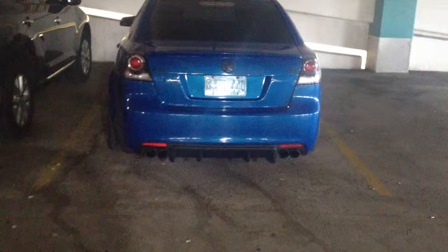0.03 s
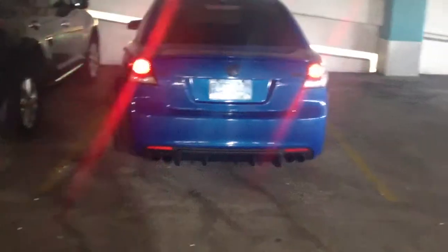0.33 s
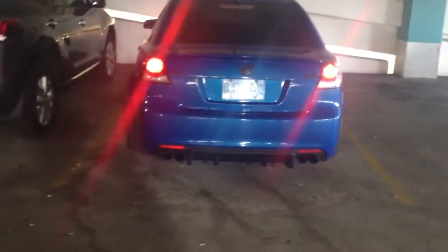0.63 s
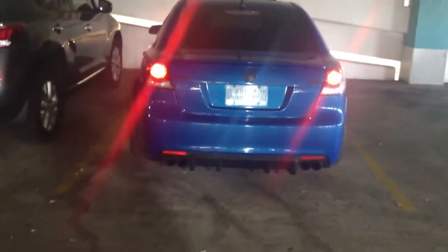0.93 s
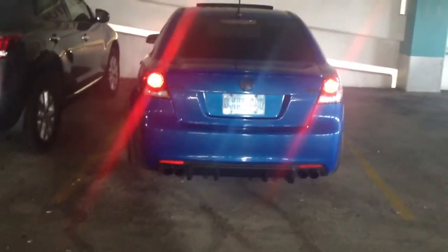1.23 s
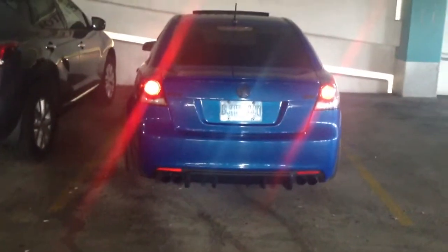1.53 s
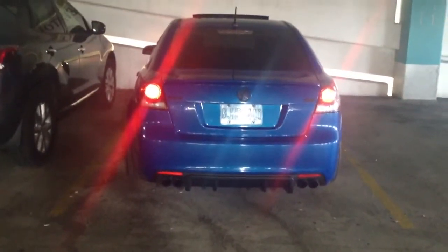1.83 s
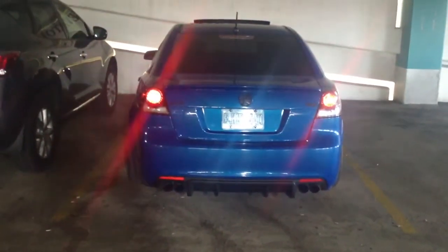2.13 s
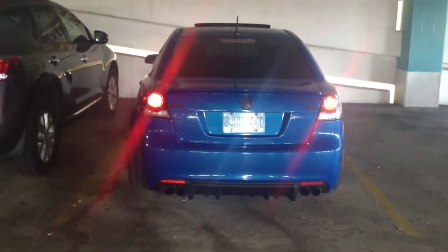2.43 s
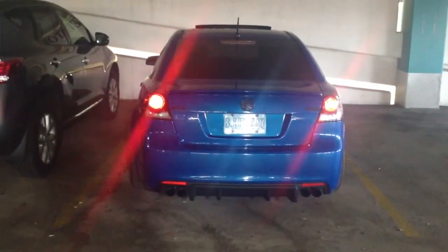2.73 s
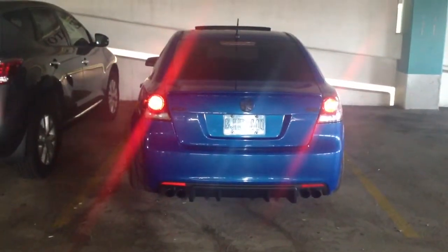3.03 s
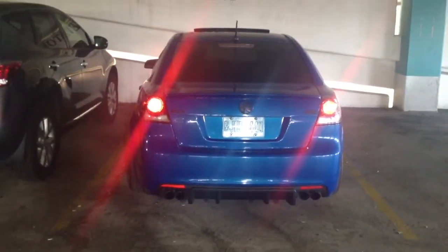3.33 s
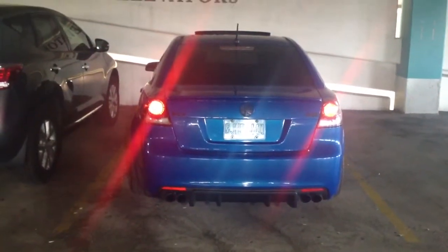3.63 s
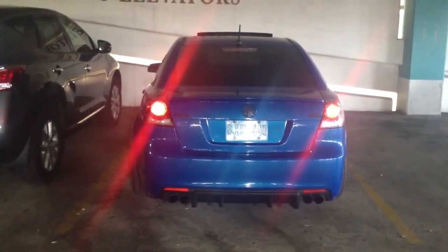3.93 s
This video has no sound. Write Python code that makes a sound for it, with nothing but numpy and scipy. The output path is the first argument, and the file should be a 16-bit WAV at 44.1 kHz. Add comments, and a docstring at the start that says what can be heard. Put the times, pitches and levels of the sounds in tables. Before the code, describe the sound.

A car starts up in an echoing garage, flaring briefly before a booming idle.

```python
"""A concrete parking garage, one microphone behind a six-cylinder car that starts from cold.
Over the ventilation a relay ticks, an actuator whines and the fuel pump primes. The starter's pinion
clashes in and cranks, labouring at each compression. The engine catches, flares with a bark and
settles into a fast idle, its uneven firings booming through the pipes and off the concrete."""
import sys
import numpy as np
from scipy import signal
from scipy.fft import rfft, irfft, next_fast_len
from scipy.io import wavfile
from scipy.ndimage import map_coordinates

SR = 44100
rng = np.random.default_rng(int(sys.argv[2]) if len(sys.argv) > 2 else 0)


def wav_record(signal):
    """Record a signal, one row per channel, as 16-bit PCM in the file named by sys.argv[1]."""
    frames = np.transpose(np.atleast_2d(signal))
    bounded = np.clip(frames, -1, 1)
    # unit amplitude maps onto the largest positive 16-bit level
    quanta = np.round(bounded * 32767).astype(np.int16)
    wavfile.write(sys.argv[1], SR, quanta)


N = 176400
PRIME_S, ENGAGE_S, CATCH_S, RELEASE_S = 1.497, 2.012, 2.692, 2.72
MIC_OPEN_S, MIC_TOP_HZ = .119, 15400

# engine speed: t/s, firing rate/Hz
FIRING_RATE = [(2.69, 61.86), (2.735, 69.1), (2.79, 71.1), (2.88, 70.67), (2.96, 69.04), (3.06, 66.1),
               (3.22, 62.98), (3.42, 61.46), (4, 60.96)]
# relative strength of each cylinder: level/dB
CYLINDER_DB = [-1, -5, -4.5, -4.5, 1, 0]
# exhaust loudness: t/s, boom level/dB, bark level/dB
EXHAUST_LEVELS = [(2.69, -30, -48), (2.725, -23, -26.5), (2.785, -14, -28.5), (2.85, -19, -23.5),
                  (2.96, -21.5, -24), (3.0, -26.5, -31), (3.24, -23.5, -30), (3.3, -22.5, -32.5),
                  (3.5, -27.5, -37.5), (4, -33.5, -39)]
# engine bay and tailpipe rasp: t/s, clatter level/dB, hiss level/dB
RASP_LEVELS = [(2.69, -35, -52), (2.73, -37, -39), (2.775, -26.5, -33), (2.83, -26, -37), (2.92, -28, -42),
               (3.0, -31, -41.5), (3.2, -33.5, -44), (3.5, -36, -48.5), (4, -36.5, -47.5)]
# spectra of the engine's layers: f/Hz, relative level/dB
BOOM_SPECTRUM = [(20, -52), (50, -23.5), (100, -26), (125, -12.5), (155, 0.5), (200, -2), (270, 1),
                 (310, -12), (380, -26.5), (700, -58), (2000, -106)]
BARK_SPECTRUM = [(100, -73), (300, -9), (345, 0), (380, -10.5), (420, -3.5), (490, 0.5), (600, -4),
                 (710, -5.5), (820, -19), (1300, -19), (4000, -64)]
CLATTER_SPECTRUM = [(440, -28.5), (750, -6.5), (854, -0.5), (905, -4.5), (1130, -2.5), (1220, -7.5),
                    (1420, -1.5), (1770, 0), (2180, -7), (2430, -8.5), (2610, -10), (2870, -11.5),
                    (3130, -9.5), (3740, -14), (4200, -14.5), (5460, -43), (9240, -120)]
HISS_SPECTRUM = [(2240, -36), (3800, -6.5), (4180, 0), (4640, 1.5), (5190, -6), (7300, -5.5), (9510, -14.5),
                 (14600, -20), (15500, -23)]
CRACK_SPECTRUM = [(300, -23), (750, 2), (1250, 2.5), (1800, -8), (3000, -6.5), (5000, -9.5), (8000, -14),
                  (15000, -25.5)]
# first firings, ringing the silencer: t/s, f/Hz, level/dB
FIRST_FIRINGS = [(2.691, 165, -23), (2.712, 205, -20.5), (2.774, 175, -14.5), (2.776, 254.2, -20.5)]
# drone under load: multiple of the firing rate, relative level/dB
FLARE_ORDERS = [(2, -1), (3, 2), (4, -6.5), (5, -22), (6, -12.5), (7, -3), (8, -24), (9, -25), (10, -12.5)]
# drone at idle: multiple of the cycle rate, relative level/dB
IDLE_ORDERS = [(14, -17), (15, -18), (16, -22), (17, -20), (18, 3.5), (19, -18), (20, -6.5), (21, -13),
               (22, -25), (23, -14), (24, -13), (25, -5.5), (26, -15), (27, -20), (28, -16), (30, -10.5),
               (31, -17)]
# loudness of the two drones and of the throb at the firing rate: t/s, level/dB
FLARE_LEVEL = [(2.69, -54), (2.73, -23), (2.8, -24.5), (2.85, -13), (2.92, -13.5), (2.98, -20), (3.03, -43),
               (3.3, -70)]
IDLE_LEVEL = [(2.9, -55), (3.02, -21), (3.2, -25.5), (3.42, -27), (3.75, -23.5), (4, -25)]
THROB_LEVEL = [(2.7, -51), (2.84, -37), (2.97, -58), (3.03, -46), (3.12, -35), (3.25, -53), (3.37, -44),
               (3.6, -50), (4, -48)]
# small metallic ticks: t/s, f/Hz, level/dB
METAL_TICKS = [(2.882, 6400, -30), (2.967, 3219, -23.5)]
# spectra of the starter's layers: f/Hz, relative level/dB
GRIND_SPECTRUM = [(150, -32), (250, -4), (385, -10.5), (474, -5.5), (646, -8.5), (692, 0.5), (768, -10.5),
                  (1080, 1.5), (1220, -7), (1330, 2), (1610, -3.5), (2490, -2.5), (3010, -10), (4550, -7.5),
                  (5220, -11.5), (7900, -12), (9230, -21.5), (14700, -29.5), (15500, -34)]
STRAIN_SPECTRUM = [(200, -33), (600, -4), (1400, 2.5), (2400, 2), (3800, -2), (6500, -3), (9000, -13.5),
                   (13000, -22.5), (15500, -20)]
CLASH_SPECTRUM = [(290, -40), (500, -10), (954, -7), (1200, -6), (1470, -2.5), (2970, -6), (4070, -3),
                  (5200, -4), (10200, -10), (15500, -21)]
# starter housing resonances: f/Hz, relative level/dB
HOUSING_RINGS = [(1324, -42), (3461, -50), (4646, -47), (4737, -58)]
# compressions that load the starter: t/s, level/dB
COMPRESSIONS = [(2.235, -39), (2.403, -31.5), (2.525, -33.5), (2.63, -32), (2.721, -34.5)]
# the fuel pump's two bands of hiss: f/Hz, relative level/dB
PUMP_HIGH_SPECTRUM = [(3500, -35), (4300, -2), (4650, -4), (4830, 5), (5050, -7), (5300, -26), (6200, -30),
                      (8000, -61)]
PUMP_LOW_SPECTRUM = [(2200, -27), (2900, -11), (3200, 2.5), (3380, -6), (3560, 9.5), (3740, -4), (3910, 5),
                     (4150, -15), (4600, -16), (5400, -59)]
# actuator whine: t/s, f/Hz, level/dB
ACTUATOR_WHINE = [(.18, 6400, -75), (.235, 7050, -55), (.29, 6730, -60), (.35, 6170, -70),
                  (.62, 6060, -63.5), (.74, 6110, -68), (.92, 6110, -60), (1.13, 6127, -62),
                  (1.33, 6140, -67), (1.41, 6160, -72), (1.5, 6160, -62), (1.57, 6160, -70)]
# the ventilation's rush of air and its fan tones: f/Hz, relative level/dB
AIR_SPECTRUM = [(25, -59), (40, -40), (59, -21.5), (88, -22), (110, -6.5), (156, -3), (250, -0.5),
                (420, -7), (780, -6), (1300, -11), (2050, -15), (2400, -21), (4400, -24), (5200, -33),
                (7000, -32), (8400, -36), (9100, -43.5), (15300, -43)]
FAN_TONES = [(166.9, -62), (737.5, -79.5), (1997, -62)]
# reverberation of the concrete: f/Hz, t60/s
GARAGE_T60 = [(100, 1.24), (1000, 0.64), (4000, 1), (12000, 0.31)]


def engine():
    """Uneven firings thump and bark through the pipes; the first ring the silencer and crack."""
    firing_hz, = curves(FIRING_RATE)
    running = clock() >= CATCH_S
    fired = np.cumsum(firing_hz * running) / SR
    onsets = np.searchsorted(fired, np.arange(int(fired[-1])) + 1e-9)
    timing, thump_spread, bark_spread = rng.standard_normal((len(onsets), 3)).T

    def firings(spread, scatter_db, jitter_s):
        """One pulse per firing, uneven in time and strength."""
        pulses = np.zeros(N)
        at = np.clip(onsets + (jitter_s * SR * timing).astype(int), onsets[0], N - 1)
        pulses[at] = amp(np.resize(CYLINDER_DB, len(onsets)) + scatter_db * spread)
        return pulses

    duty_gain = np.sqrt(running.mean())  # refers the rms to the time the engine runs
    boom_db, bark_db = curves(EXHAUST_LEVELS)
    thumps = garage(firings(thump_spread, scatter_db=0.91, jitter_s=0.00302), wet_db=-1)
    boom = duty_gain * amp(boom_db - 0.5) * colour(thumps, BOOM_SPECTRUM)
    slaps = garage(firings(bark_spread, scatter_db=2.2, jitter_s=.0004), wet_db=3.5)
    bark = duty_gain * amp(bark_db) * colour(slaps, BARK_SPECTRUM)
    rattle = rasp(fired)
    silencer = sum(amp(db) * burst(s, 0.012, 0.0059, 0.17) * tone(hz, 0.41, 60)
                   for s, hz, db in FIRST_FIRINGS)
    cold_firings = firings(thump_spread, scatter_db=1.9, jitter_s=0.00044)
    pops = signal.lfilter([1], [1, -np.exp(-1 / (0.0034 * SR))], cold_firings)  # 3.4 ms decay each
    crack = duty_gain * amp(-29) * burst(2.725, 0.017, 0.026, t60=1) * noise(CRACK_SPECTRUM, pops)
    catch = silencer + garage(crack, wet_db=0.5)
    fade_in = burst(CATCH_S, 0.016, hold=N / SR, t60=1)
    return catch + fade_in * (boom + bark + rattle + exhaust_drone(firing_hz))


def exhaust_drone(firing_hz):
    """The regular part of the firing: engine orders, harder under load than at idle."""
    cycle_hz = firing_hz / len(CYLINDER_DB)
    flare = amp(curves(FLARE_LEVEL)[0]) * drone(FLARE_ORDERS, firing_hz, rough=0.066)
    idle = amp(curves(IDLE_LEVEL)[0]) * drone(IDLE_ORDERS, cycle_hz, rough=0.16)
    throb = amp(curves(THROB_LEVEL)[0]) * tone(firing_hz, .25, 9.2)
    return flare + idle + throb


def drone(orders, hz, rough):
    """Engine orders at multiples of hz, each a little unsteady in level and phase."""
    return unit(sum(amp(db) * (1 + rough * wobble(14)) * tone(k * hz, rough, 24) for k, db in orders))


def rasp(fired):
    """Engine bay and tailpipe: clatter that puffs at each firing, and a flickering hiss."""
    clatter_db, hiss_db = curves(RASP_LEVELS)
    puffs = (2.5 + np.exp(-4 * (fired % 1))) * amp(0.91 * wobble(70))
    clatter = amp(clatter_db + 1.5) * noise(CLATTER_SPECTRUM, puffs)
    hiss = amp(hiss_db + 1) * noise(HISS_SPECTRUM, amp(0.65 * wobble(70)))
    return clatter + hiss


def ticks():
    """Short metallic ticks as the engine flares."""
    pings = sum(amp(db) * burst(s, 0.0016, 0, 0.0142) * tone(hz, 0.45, 630) for s, hz, db in METAL_TICKS)
    return garage(pings, wet_db=-5)


def starter():
    """The pinion clashes into the ring gear, then grinds, labouring at each compression."""
    engaged = burst(ENGAGE_S, 0.024, hold=RELEASE_S - ENGAGE_S, t60=1.0)
    teeth = amp(0.75 * wobble(500))
    grind = engaged * amp(-34) * noise(GRIND_SPECTRUM, teeth)
    load = sum(amp(db) * burst(s - .018, 0.01, 0.033, 0.24) for s, db in COMPRESSIONS)
    strain = load * noise(STRAIN_SPECTRUM, teeth)
    housing = engaged * sum(amp(db - 4.5) * (1 + .5 * wobble(25.03)) * tone(hz, 1.24, 75)
                            for hz, db in HOUSING_RINGS)
    squeal = amp(-43 + 2 * wobble(37.8)) * burst(2.37, 0.17, .02, 0.48) * tone(7830, 1.2, 220)
    clash = amp(-22) * burst(ENGAGE_S - .005, .016, 0.019, 0.14) * noise(CLASH_SPECTRUM, teeth)
    chuff_spectrum = [(100, -37), (140, -1.5), (165, 4), (230, -11), (330, -35.5)]
    chuff = amp(-43) * burst(2.33, 0.017, .06, 0.89) * noise(chuff_spectrum)
    return grind + housing + squeal + chuff + strain + garage(clash, wet_db=-4.5)


def fuel_pump():
    """The pump primes with a spurt and a hiss that sinks as pressure builds."""
    high = amp(-45) * burst(PRIME_S, 0.024, 0.063, 2.1) * noise(PUMP_HIGH_SPECTRUM)
    low = amp(-45.5) * burst(PRIME_S + 0.018, 0.051, 0.23, 2.2) * noise(PUMP_LOW_SPECTRUM)
    spurt_spectrum = [(4000, -32), (5700, 6), (7000, -1), (8200, -10), (10000, -22), (14000, -24)]
    spurt = amp(-59.5) * burst(PRIME_S, 0.022, 0.07, 0.7) * noise(spurt_spectrum)
    return spurt + high + low


def relay():
    """A relay ticks once and the concrete answers."""
    spectrum = [(500, -29), (1800, 4.5), (2800, -8), (4300, 0), (7000, -12), (12500, -19), (15000, -30)]
    tick = amp(-41.5) * burst(0.144, 0.0065, .004, 0.087) * noise(spectrum)
    return garage(tick, wet_db=-3)


def actuator():
    """An actuator's thin whine, joined partway by a faint octave."""
    hz, db = curves(ACTUATOR_WHINE)
    whine = amp(db + .6 * wobble(25.6)) * burst(.17, .02, 1.7, .3) * tone(hz, 0.22, 250)
    octave = amp(-82) * burst(0.77, .06, 0.19, 2.3) * tone(2 * hz, .8, 120)
    return garage(whine, wet_db=-4.5) + octave


def ventilation():
    """The room tone: rushing air and faint fan tones."""
    air = amp(-44 + 0.49 * wobble(13)) * noise(AIR_SPECTRUM)
    fan = sum(amp(db - 1) * tone(hz, 0.56, 7.4) for hz, db in FAN_TONES)
    return air + fan


def garage(direct, wet_db):
    """Direct sound plus the concrete's tail, at about the same total power."""
    hz, t, bands = signal.stft(rng.standard_normal(SR), SR, nperseg=256)
    decay = amp(-60 * t / along(GARAGE_T60, hz)[:, None])
    tail = signal.istft(bands * decay, SR, nperseg=256)[1]
    wet = signal.fftconvolve(direct, tail / np.linalg.norm(tail))[:N]
    return (direct + amp(wet_db) * wet) / np.hypot(1, amp(wet_db))


def amp(db):
    """Decibels to gain."""
    return 10 ** (np.asarray(db) / 20)


def unit(x):
    """Scale to rms 1."""
    return x / np.sqrt(np.mean(x ** 2) + 1e-20)


def clock():
    """Time of each sample in seconds."""
    return np.arange(N) / SR


def along(points, hz):
    """Interpolate (f/Hz, value) points on a log frequency axis."""
    freqs, values = np.transpose(points)
    return np.interp(np.log(hz + 1), np.log(np.sort(freqs) + 1), values)


def curves(rows):
    """One value per sample for each column after the time."""
    times, *columns = np.transpose(rows)
    return [np.interp(clock(), times, column) for column in columns]


def wobble(rate):
    """A smooth random curve, rate knots a second."""
    return map_coordinates(rng.standard_normal(int(N * rate / SR) + 4), [clock() * rate])


def colour(x, spectrum):
    """Causal filter with the given (f/Hz, level/dB) shape; the result has rms 1."""
    size = 2 * next_fast_len(N)
    gain = amp(along(spectrum, np.fft.rfftfreq(size, 1 / SR)))
    cepstrum = irfft(np.log(gain + 1e-6), size)
    cepstrum[1:size // 2] *= 2  # fold onto positive time for minimum phase
    cepstrum[size // 2 + 1:] = 0
    return unit(irfft(rfft(x, size) * np.exp(rfft(cepstrum)), size)[:N])


def noise(spectrum, gate=1):
    """Coloured noise, optionally chopped before the filter."""
    return colour(rng.standard_normal(N) * gate, spectrum)


def burst(start, attack, hold, t60):
    """Linear attack, hold and exponential release, all in seconds."""
    t = clock() - start
    return np.clip(t / attack, 0, 1) * amp(-60 * np.maximum(t - attack - hold, 0) / t60)


def tone(hz, blur, rate):
    """A sine of rms 1 whose phase wanders by blur radians, rate times a second."""
    cycles = np.cumsum(hz * np.ones(N)) / SR + rng.random()
    return np.sqrt(2) * np.sin(2 * np.pi * cycles + blur * wobble(rate))


def scene():
    """The car from behind, over the garage's ventilation, in mono."""
    return (ventilation() + relay() + actuator() + fuel_pump() + starter() + engine() + ticks())[None]


def record(dry):
    """The microphone opens after a short silence and keeps nothing above its band limit."""
    size = next_fast_len(N + SR // 2)
    opened = dry * (clock() >= MIC_OPEN_S)
    in_band = np.fft.rfftfreq(size, 1 / SR) < MIC_TOP_HZ
    return irfft(rfft(opened, size) * in_band, size)[:, :N]


dry = scene()
out = record(dry)
wav_record(out)
```